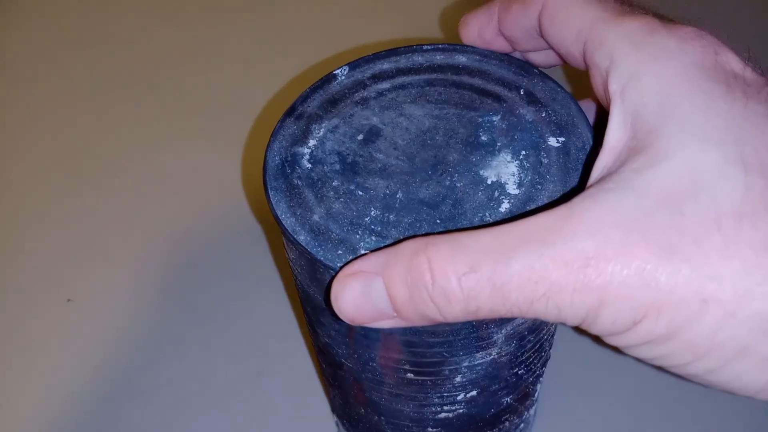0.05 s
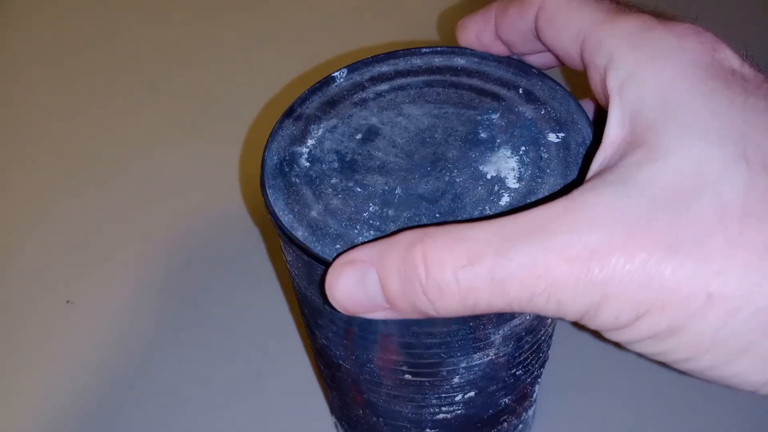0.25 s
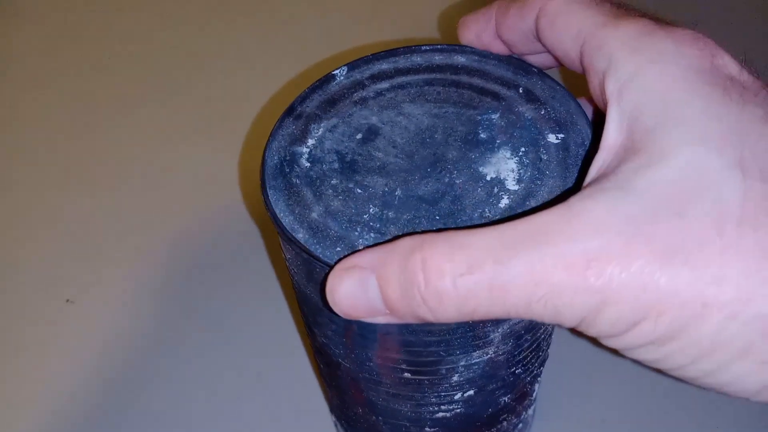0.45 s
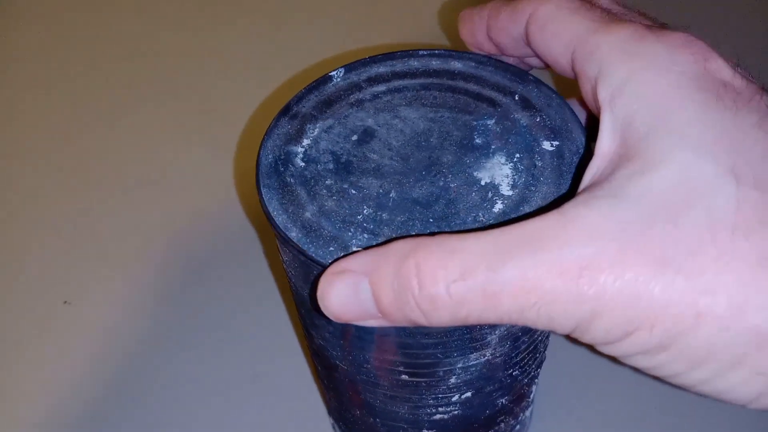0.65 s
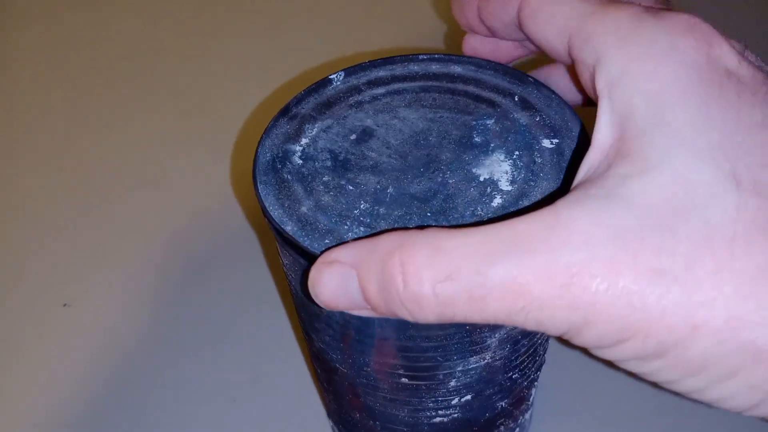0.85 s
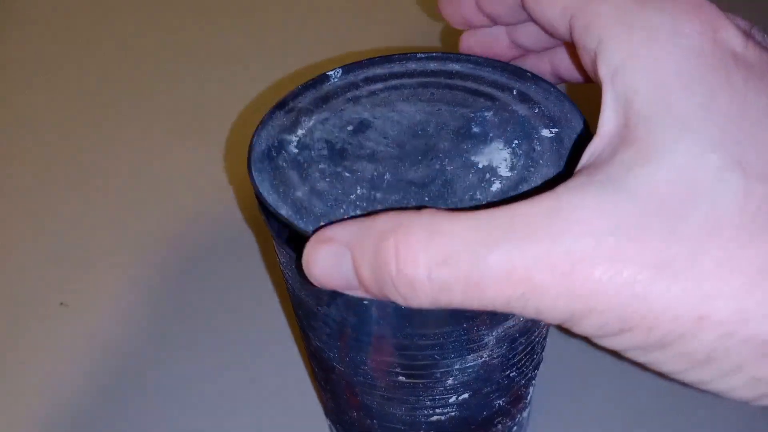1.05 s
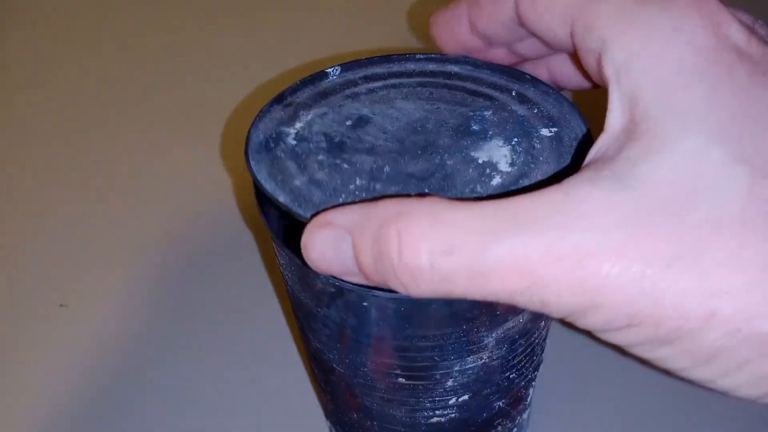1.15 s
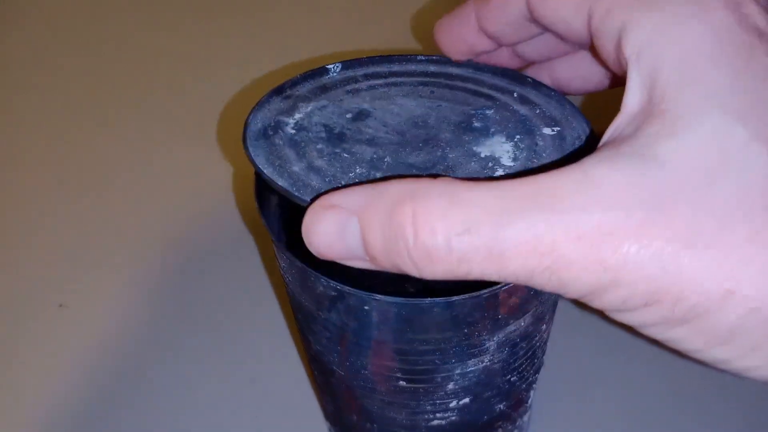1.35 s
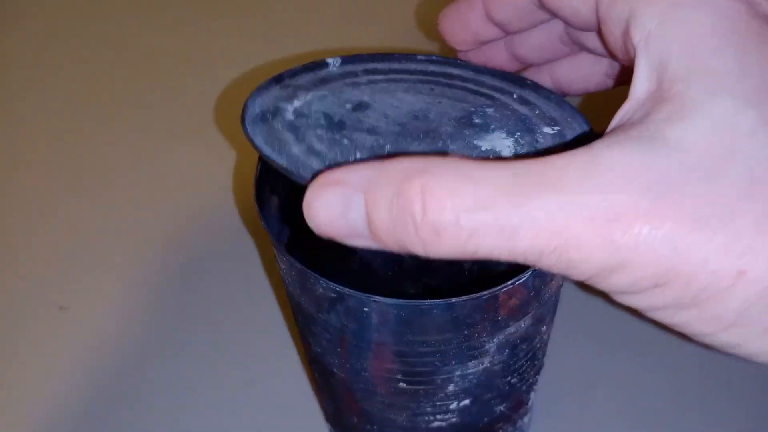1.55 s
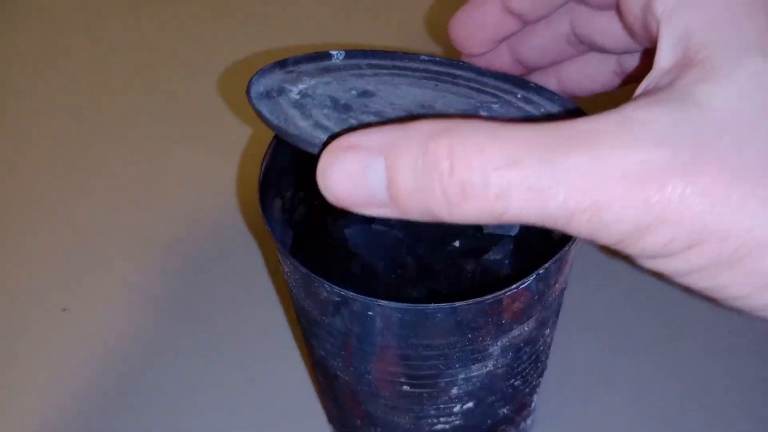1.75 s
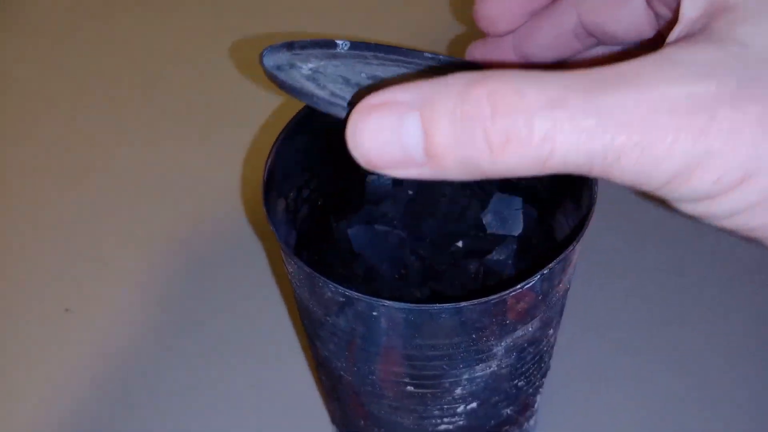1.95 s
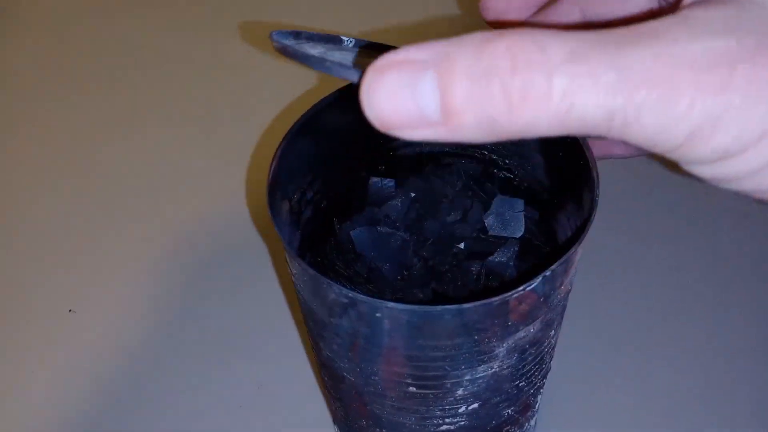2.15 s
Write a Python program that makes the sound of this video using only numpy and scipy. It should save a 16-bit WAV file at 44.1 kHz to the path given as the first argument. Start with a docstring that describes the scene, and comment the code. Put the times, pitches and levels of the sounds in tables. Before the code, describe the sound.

A tight lid is worked off a tin can by hand: a brief grate and a soft, low pop, then faint metal scrapes and ticks, and one light clack. Heard close by in a small room.

```python
"""Opening a tin can

A hand works the tight lid off a tin can on a table, close by in a small room. Stick-slip friction
makes the lid grate until the seal gives with a pop of air. The rim rubs and ticks on the way up,
exciting the modes of the tin, and the lid knocks once on the can. The can bumps softly in the hand;
under it all lie a low room rumble and a thin pulsing whine."""
import sys
import numpy as np
from scipy import signal
from scipy.fft import rfft, irfft
from scipy.io import wavfile
from scipy.ndimage import uniform_filter1d

SR = 44100
rng = np.random.default_rng(int(sys.argv[2]) if len(sys.argv) > 2 else 0)


def wrap_up_sound(samples):
    """Save the sound to the file named by the first command line argument, as 16-bit audio."""
    columns = np.atleast_2d(samples).T
    # keep every value between -1 and 1, then stretch to whole-number steps
    tamed = np.clip(columns, -1, 1)
    steps = np.round(tamed * 32767).astype(np.int16)
    wavfile.write(sys.argv[1], SR, steps)


N = 97020


def amplitude(db):
    return 10 ** (np.asarray(db) / 20)


def clock():
    return np.arange(N) / SR


def unit_rms(x):
    return x / np.sqrt(np.mean(x ** 2))


def at_level(x, db, window_s=.004):
    """Scaling sets the greatest short-time RMS level."""
    power = uniform_filter1d(x ** 2, int(window_s * SR))
    return x * amplitude(db) / np.sqrt(power.max())


def wander(rate_hz):
    """Linear interpolation between Gaussian values gives a random drift."""
    t = clock() * rate_hz
    count = int(t[-1]) + 2
    return np.interp(t, np.arange(count), rng.standard_normal(count))


def convolve(x, response):
    return signal.fftconvolve(x, response)[:len(x)]


def colour(x, spectrum, size=4096):
    """A minimum-phase filter imposes a spectrum of (frequency [Hz], gain [dB]) points."""
    hz, db = np.array(spectrum, float).T
    bins_hz = np.maximum(np.fft.rfftfreq(size, 1 / SR), 1)
    gain = amplitude(np.interp(np.log(bins_hz), np.log(hz), db))
    cepstrum = irfft(np.log(gain))
    cepstrum[1:size // 2] *= 2  # folding makes the response causal
    cepstrum[size // 2 + 1:] = 0
    return convolve(x, irfft(np.exp(rfft(cepstrum))))


def resonator(x, hz, width_hz):
    """A second-order resonance passes one band."""
    return signal.lfilter(*signal.iirpeak(hz, hz / width_hz, fs=SR), x)


def ring(drive, modes, grip_detune=.004):
    """Modal superposition: damped modes add, detuned slightly by the grip at each contact."""
    out = 0
    for (hz, db, t60), shift in zip(modes, rng.uniform(-0.43, 1, len(modes))):
        width_hz = np.log(1000) / (np.pi * t60)
        mode = resonator(drive, hz * (1 + grip_detune * shift), width_hz)
        out = out + amplitude(db) * unit_rms(mode)
    return unit_rms(out)


def friction(at, rise_s, fall_s, grain_s=.0003, spread_db=5.5):
    """Stick-slip friction: tiny slips of uneven size swell to a peak and die away."""
    t, grain = clock() - at, int(grain_s * SR)
    slip_db = spread_db * np.repeat(rng.uniform(-1.3, 1, N // grain + 1), grain)[:N]
    envelope = np.exp(np.maximum(np.minimum(t / rise_s, -t / fall_s), -20))
    return rng.standard_normal(N) * amplitude(slip_db) * envelope


def damped_sine(at, db, hz, rise_s, fall_s):
    """A damped oscillation; the level is that of the sine before its envelope."""
    t = np.maximum(clock() - at, 0)
    envelope = (1 - np.exp(-t / rise_s)) * np.exp(-t / fall_s)
    return amplitude(db) * envelope * np.sin(2 * np.pi * hz * t)


# Spectrum of the room noise: (frequency [Hz], gain [dB])
RUMBLE_SPECTRUM = [(20, -58), (40, -22), (58, -6.5), (85, -1.5), (120, -1.5), (220, -4.5), (330, -15),
                   (470, -19.5), (560, -18), (700, -25), (1400, -34), (2700, -40), (7400, -42.5),
                   (8400, -57), (13500, -62), (15300, -51.5)]
def rumble(db=-52.5, drift_db=0.5):
    """Filtered noise gives a rumble with faint hiss; the bass drifts slightly in level."""
    noise = unit_rms(colour(rng.standard_normal(N), RUMBLE_SPECTRUM))
    bass = signal.sosfilt(signal.butter(1, 300, fs=SR, output="sos"), noise)
    drift = amplitude(drift_db * wander(rate_hz=13.94))
    return amplitude(db) * (noise + bass * (drift - 1))


def whine(db=-67.5, centre_hz=7576, waver_hz=45, pulse_hz=17.92, flutter_db=-9.5, flicker_db=3):
    """Frequency and amplitude modulation make a thin tone waver, pulse and flutter between pulses."""
    hz = centre_hz + waver_hz * wander(rate_hz=250)
    tone = unit_rms(np.sin(2 * np.pi * np.cumsum(hz) / SR))
    swell = np.cos(np.pi * pulse_hz * (clock() - .046)) ** 2
    flutter = amplitude(flutter_db) * (1 - swell) * wander(2 * pulse_hz)
    flicker = amplitude(flicker_db * wander(2 * pulse_hz))
    return amplitude(db) * (swell ** 2.25 + flutter) * flicker * tone


def room(x, db, t60_s, delay_s=0.0067):
    """Reverberation: the diffuse field of a small room decays exponentially."""
    t = clock()[:SR // 2]
    tail = rng.standard_normal(len(t)) * np.exp(-np.log(1000) * t / t60_s) * (t > delay_s)
    return amplitude(db) * convolve(x, tail / np.sqrt(np.sum(tail ** 2)))


# Bumps of the can in the hand: (time [s], level [dB], frequency [Hz])
CAN_BUMPS = [(.262, -35, 116.5), (0.315, -41.5, 71.3), (0.523, -38, 90), (0.568, -42, 83),
             (.785, -42.5, 82.5), (1.077, -35.5, 91), (1.107, -29.5, 92.6), (1.236, -35, 87),
             (1.268, -41.5, 80.7)]
def bumps():
    """Each soft impact excites two damped oscillations, a low thud and a faint hollow note."""
    out = 0
    for at, db, hz in CAN_BUMPS:
        thud = damped_sine(at, db, hz, rise_s=0.0077, fall_s=0.021)
        hollow = damped_sine(at, db - 26, hz=598.5, rise_s=0.0022, fall_s=0.026)
        out = out + thud + hollow
    return out


# Small catches of the rim: (time [s], level [dB], frequency [Hz])
RIM_PINGS = [(.248, -52, 3310), (.254, -47, 5700), (.263, -46.5, 2407), (.521, -69, 6010),
             (0.549, -80, 11320), (.549, -69, 5610), (.776, -63.5, 2567), (.869, -79, 11950),
             (.888, -63.5, 3340), (.89, -67, 9330), (.893, -59.5, 5980), (1.094, -69.5, 11700),
             (1.211, -58, 4600), (1.214, -61, 4880), (1.59, -84, 11950), (1.657, -76, 11430),
             (1.66, -67.5, 5630)]
def pings(rise_s=0.00088, fall_s=.006, t60_s=0.053):
    """Resonance: a few slips at one spot of the rim ring a single mode of the tin."""
    return sum(at_level(ring(friction(at, rise_s, fall_s), [(hz, 0, t60_s)]), db)
               for at, db, hz in RIM_PINGS)


# Groans of the tight rim: (time [s], rise [s], fall [s], level [dB], frequency [Hz])
RIM_GROANS = [(.186, 0.012, 0.045, -64.5, 1040), (0.231, 0.0053, 0.0062, -54, 1113),
              (0.2467, 0.00091, 0.0013, -42.5, 970), (.256, 0.00075, 0.00096, -43, 917)]
def groans(t60_s=0.03):
    """Friction-driven vibration: the stuck rim shudders in a mode of the can, lower as it gives."""
    out = 0
    for at, rise, fall, db, hz in RIM_GROANS:
        shudder = ring(friction(at, rise, fall), [(hz, 0, t60_s)])
        out = out + at_level(resonator(shudder, hz, width_hz=160), db)
    return out


# Modes of the lid: (frequency [Hz], level [dB], T60 [s])
LID_MODES = [(1500, -7.5, 0.087), (2364, -11, 0.28), (2723, -3, 0.084), (3007, 0, 0.049),
             (3410, -5.5, 0.099), (4090, -6.5, 0.19), (4800, 2, 0.14), (5760, 3.5, 0.032), (5950, 2, 0.16),
             (6910, -4, 0.076), (9310, -6.5, 0.048)]
# Damped modes of the can wall: (frequency [Hz], level [dB], T60 [s])
WALL_MODES = [(400, -4, 0.06), (1120, 2, 0.016), (1577, -3, 0.025), (2175, -3, 0.0073), (3250, 0.5, 0.0088),
              (3976, 0, 0.03), (4440, 3.5, 0.0038), (5950, -3.5, 0.12), (5620, 3.5, 0.0065),
              (7500, 4, 0.04)]
# Spectrum of tin-on-tin contact: (frequency [Hz], gain [dB])
CONTACT_SPECTRUM = [(200, -53), (700, 1.5), (1400, 3.5), (1950, 2.5), (2500, 5), (4000, 1.5), (4700, -6.5),
                    (5700, 0.5), (7000, -4), (8600, -7.5), (10500, -11), (13300, -12.5), (15200, 4.5)]
# Rubs of the rim: (time [s], rise [s], fall [s], level [dB], bass [dB], treble [dB], lid ring [dB])
RIM_RUBS = [(0.069, 0.0047, 0.023, -62, 12, -6, -10), (0.229, 0.0035, 0.017, -64.5, 3, -3, 2),
            (0.249, 0.0031, 0.012, -44.5, -1.5, -11, -22), (.264, 0.005, 0.011, -39.5, 1.5, -7, -10),
            (.296, 0.0031, 0.0088, -55, 0, -19, -4), (.550, 0.005, 0.008, -66.5, -9, -8, 1),
            (.648, 0.012, 0.051, -69, 7.5, -3, -3), (0.776, 0.0015, 0.021, -60, 6, -17, -5.5),
            (.871, 0.0024, 0.02, -63.5, 4, 5, -14), (0.894, 0.0066, 0.014, -59.5, 1.5, 5, -4),
            (1.101, 0.01, 0.0054, -60, -2, -4, 10), (1.115, 0.0052, 0.01, -55.5, -14, 7.5, 2),
            (1.213, 0.0069, 0.014, -54, -2.5, 2, 5), (1.248, 0.007, 0.011, -54.5, -4.5, 5, -8),
            (1.66, 0.003, 0.0052, -61, 5, 6, -9), (1.667, 0.0057, 0.041, -66.5, 3.5, -6, -4)]
def rubs(wall_db=-6):
    """Forced vibration: the grating rim drives the lid and the middle modes of the wall."""
    out = 0
    for at, rise, fall, db, bass_db, treble_db, lid_db in RIM_RUBS:
        grit = unit_rms(colour(friction(at, rise, fall), CONTACT_SPECTRUM))
        wall = amplitude(wall_db) * ring(grit, WALL_MODES[1:-1])
        lid = amplitude(lid_db) * ring(grit, LID_MODES)
        tilt = [(1100, bass_db), (4000, 0), (7000, 0), (10000, treble_db), (15000, treble_db / 2)]
        out = out + at_level(colour(grit + wall + lid, tilt), db)
    return out


# Snaps of the rim: (time [s], fall [s], level [dB], frequency [Hz], bandwidth [Hz])
RIM_TICKS = [(1.0943, .0015, -50.5, 5800, 453), (1.211, 0.0037, -47, 6130, 2430)]
def ticks(crack_db=-15.5, lid_db=-9):
    """Impulsive excitation: the rim snaps past a catch and rings the upper modes of the lid."""
    crack_spectrum = [(1000, -30), (2700, -15), (7000, 0), (8500, -7), (13000, 11), (15000, -27)]
    out = 0
    for at, fall, db, hz, width_hz in RIM_TICKS:
        slips = friction(at, rise_s=.0003, fall_s=fall)
        snap = resonator(resonator(slips, hz, width_hz), hz, width_hz)
        crack = amplitude(crack_db) * unit_rms(colour(slips, crack_spectrum))
        lid = amplitude(lid_db) * ring(snap, LID_MODES[2:])
        out = out + at_level(unit_rms(snap) + crack + lid, db)
    return out


# Tone balance of the knock: (frequency [Hz], gain [dB])
KNOCK_SPECTRUM = [(420, 9), (760, -5), (1100, 4.5), (7700, -5), (8500, -16), (9400, 0), (10300, -6.5),
                  (15200, -9)]
# Chattering contacts within the knock: (time [s], level [dB])
KNOCK_CONTACTS = [(1.8879, -46), (1.8901, -40), (1.8928, -45.5)]
def knock(lid_db=-12.5, crack_db=-6.5):
    """Impact: the freed lid clacks on the can wall, and both ring in their natural modes."""
    force = sum(amplitude(db) * unit_rms(friction(at, rise_s=0.0001, fall_s=0.0014))
                for at, db in KNOCK_CONTACTS)
    crack = unit_rms(colour(force, CONTACT_SPECTRUM))
    wall = ring(crack, WALL_MODES)
    lid = amplitude(lid_db) * ring(crack, LID_MODES)
    clack = colour(wall + lid + amplitude(crack_db) * crack, KNOCK_SPECTRUM)
    return at_level(clack, max(db for at, db in KNOCK_CONTACTS))


# Low modes of the air in and around the can: (frequency [Hz], level [dB], T60 [s])
AIR_MODES = [(170.4, -13, 0.24), (234.4, -3, 0.15), (287, 1, 0.12)]
def air_resonance(drive, relative_db=-6):
    """Acoustic resonance: the air rings on after the pulses that stir it."""
    return amplitude(relative_db) * np.std(drive) * ring(drive, AIR_MODES)


# Pops of air at the seal: (time [s], level [dB], frequency [Hz])
SEAL_POPS = [(0.2451, -25.5, 265), (0.266, -26, 170), (0.268, -16.5, 241.8)]
def seal_pops():
    """Pressure release: as the seal gives, the air swings in heavily damped oscillations."""
    return sum(damped_sine(at, db, hz, rise_s=0.0022, fall_s=0.0044) for at, db, hz in SEAL_POPS)


def scene():
    """Superposition: tin, air, bumps, reverberation and background add in one channel."""
    metal = rubs() + groans() + ticks() + pings() + knock()
    pops = seal_pops()
    air = air_resonance(pops)
    reverberation = room(metal, db=-13.5, t60_s=0.17) + room(pops, db=-8.5, t60_s=0.19)
    return (metal + pops + air + bumps() + reverberation + rumble() + whine())[None]


def record(dry, cutoff_hz=15750):
    """Band limiting: a steep elliptic low-pass filter removes the highest treble."""
    return signal.sosfilt(signal.ellip(10, .2, 70, cutoff_hz, fs=SR, output="sos"), dry)


dry = scene()
out = record(dry)
wrap_up_sound(out)
```